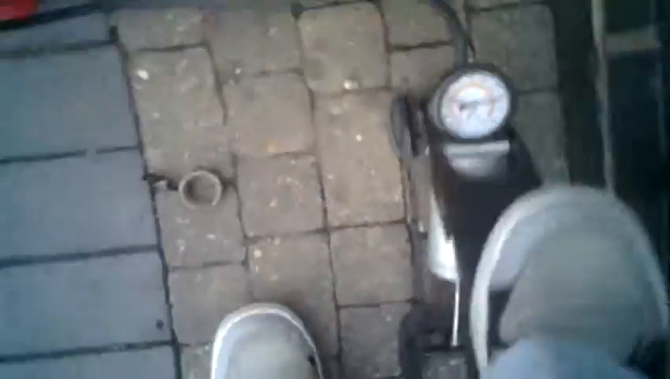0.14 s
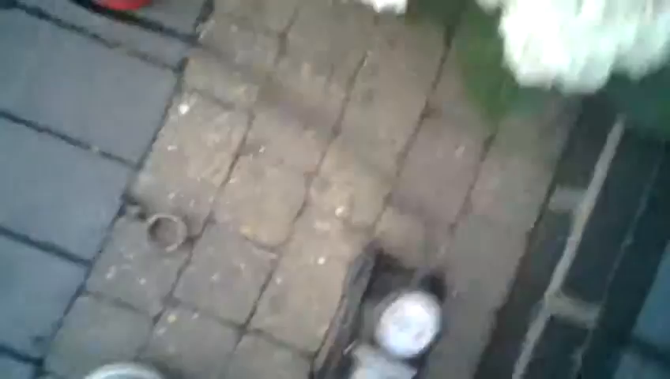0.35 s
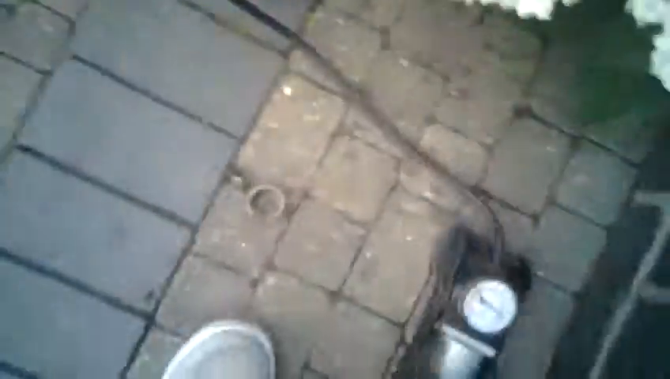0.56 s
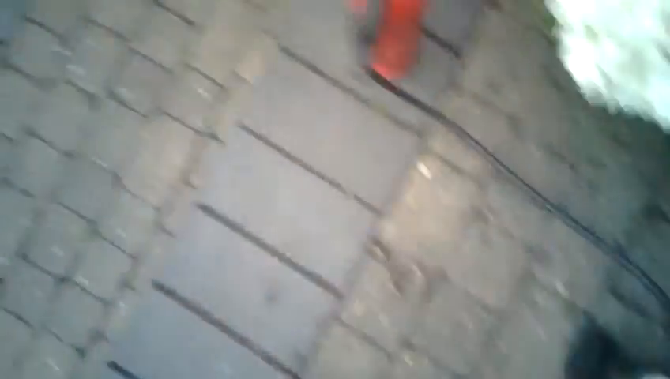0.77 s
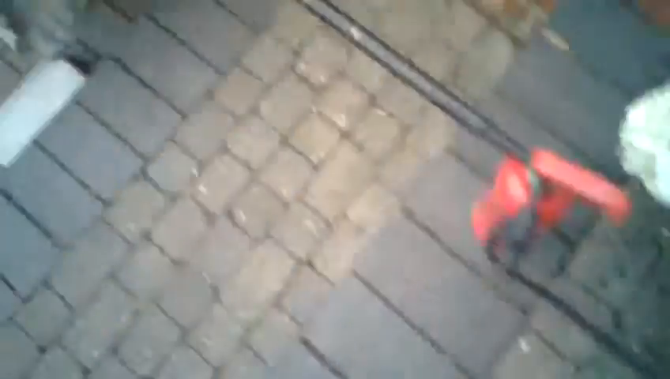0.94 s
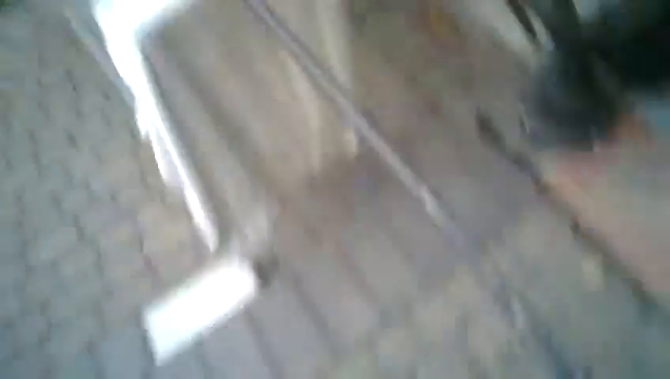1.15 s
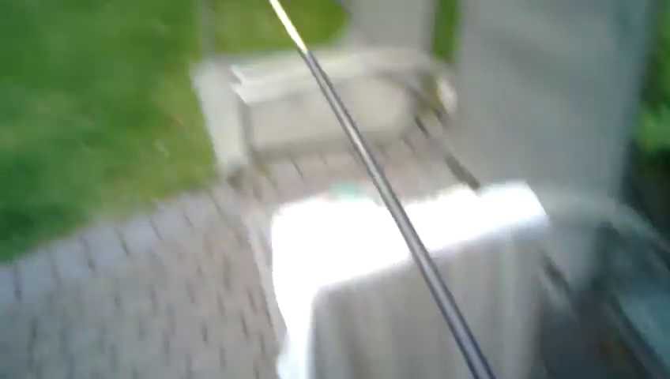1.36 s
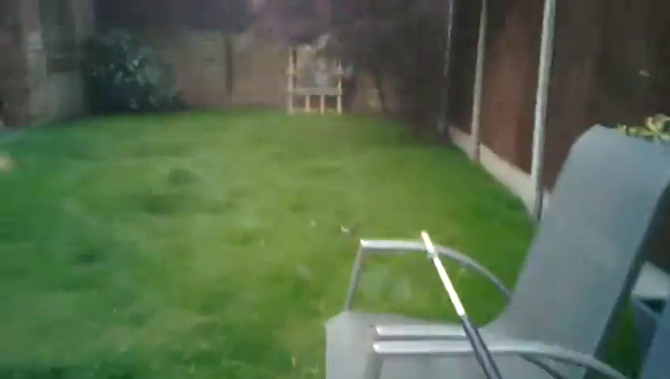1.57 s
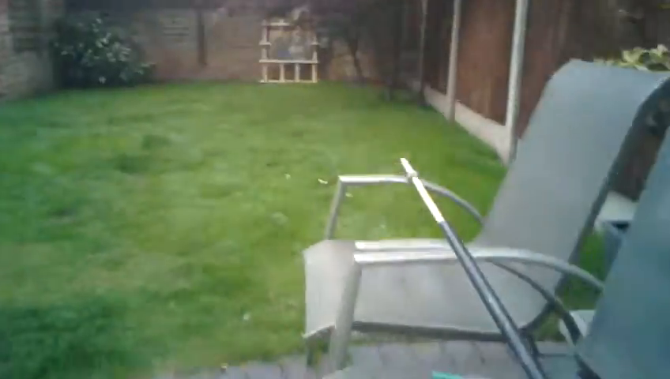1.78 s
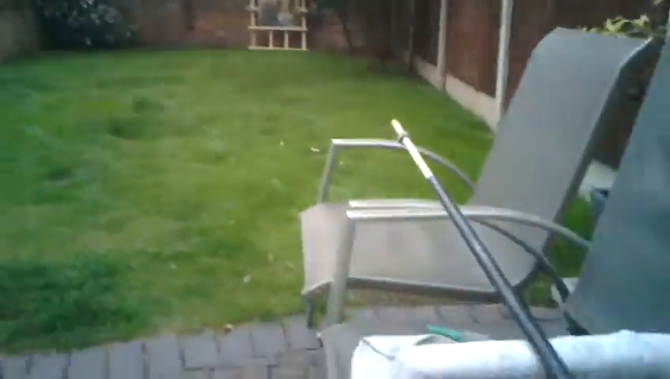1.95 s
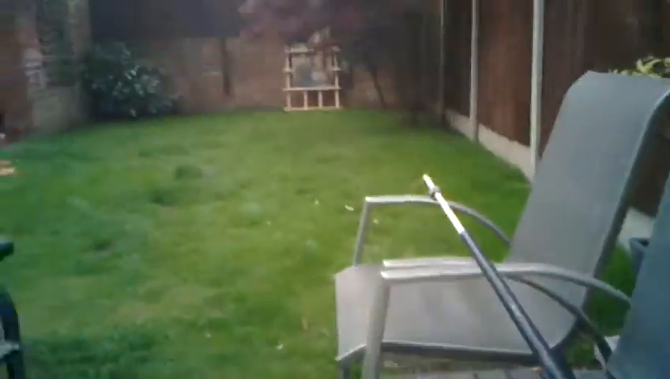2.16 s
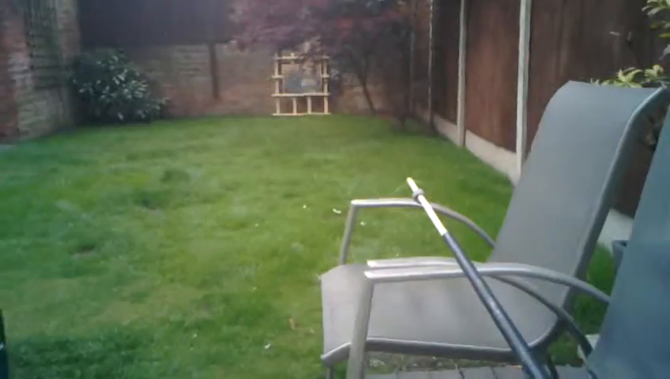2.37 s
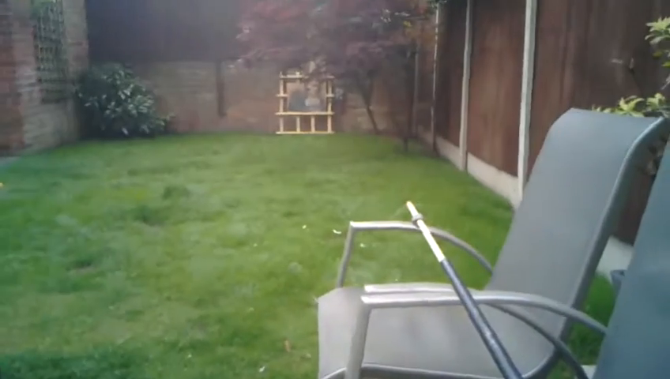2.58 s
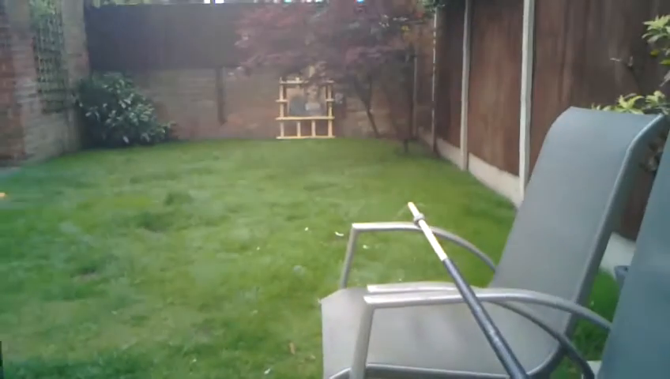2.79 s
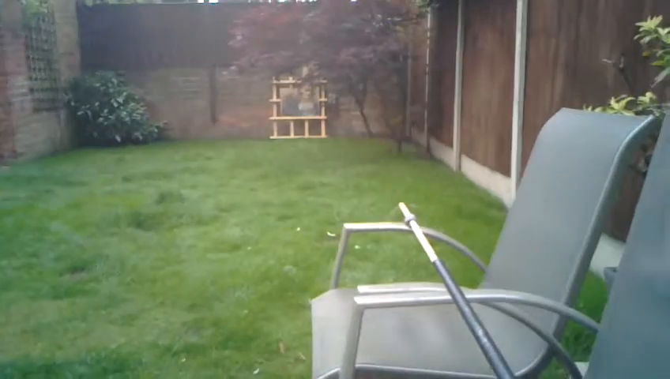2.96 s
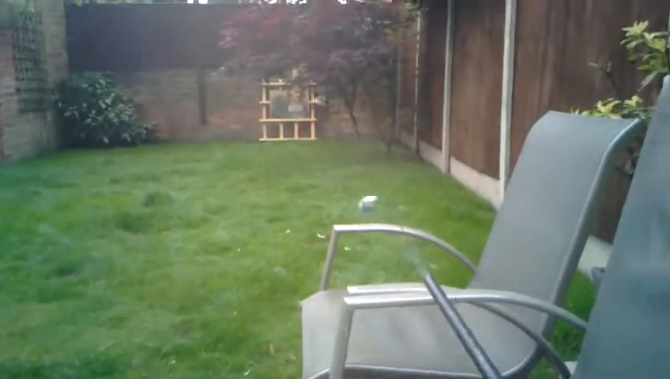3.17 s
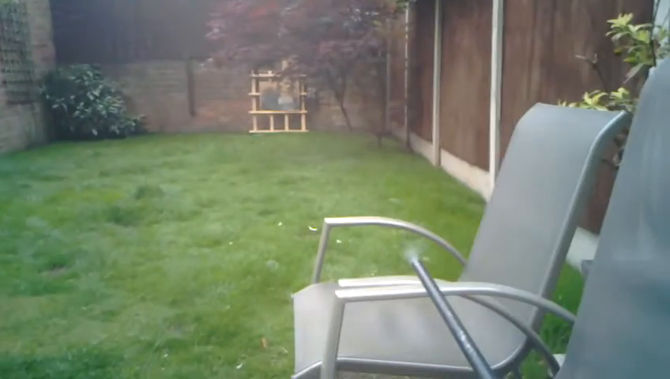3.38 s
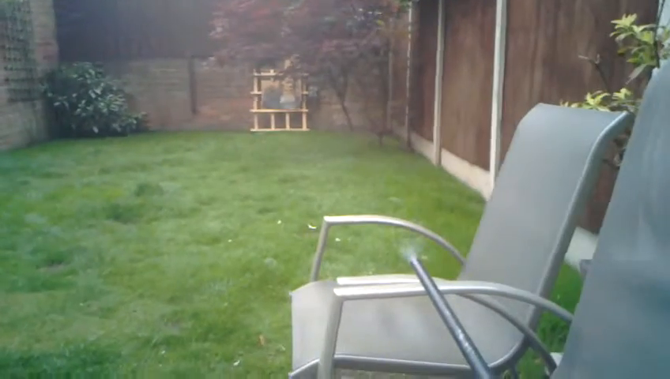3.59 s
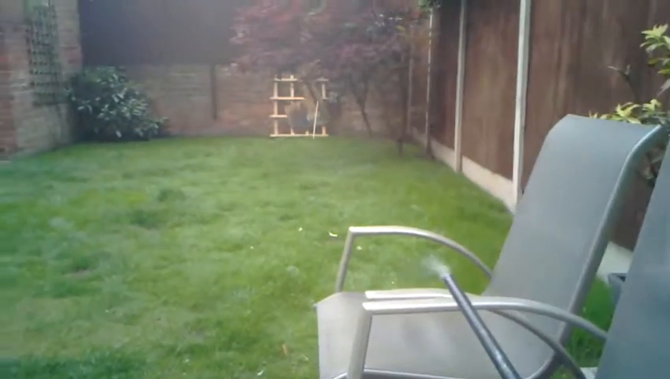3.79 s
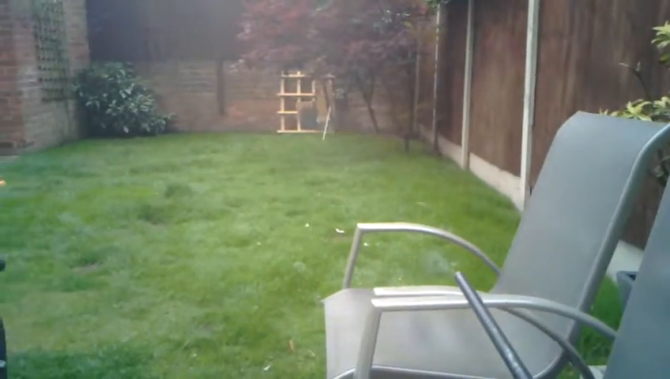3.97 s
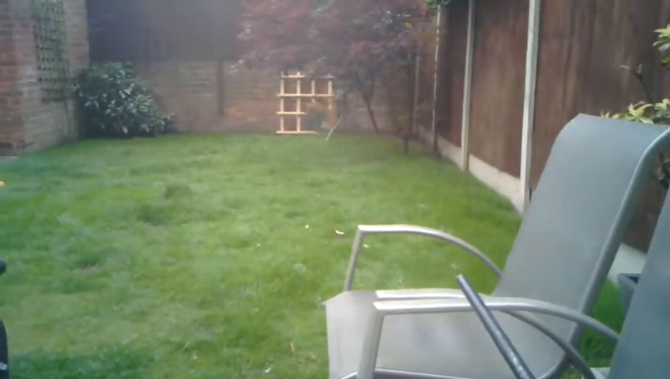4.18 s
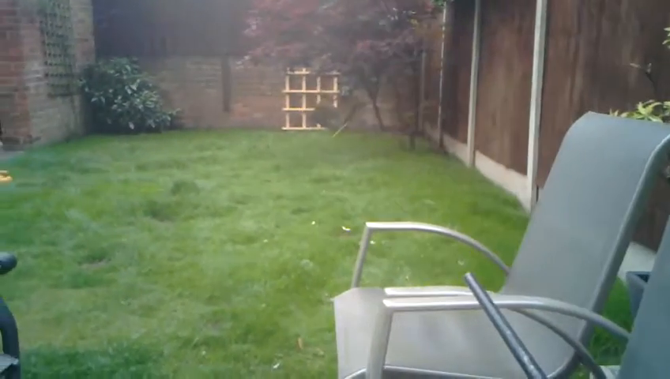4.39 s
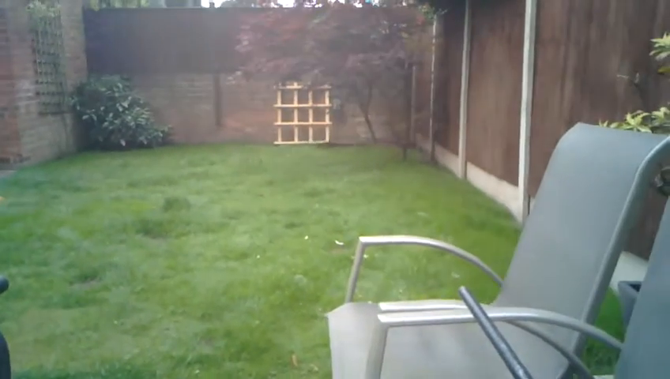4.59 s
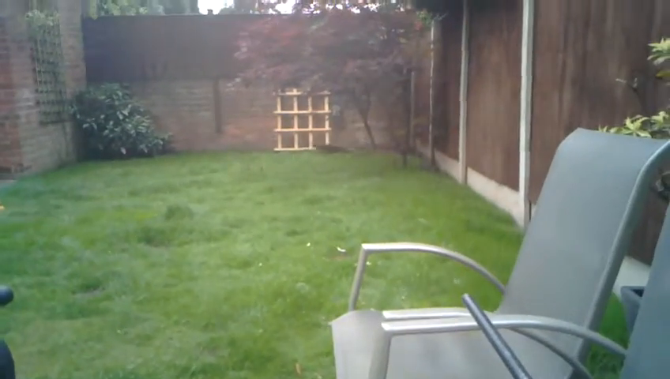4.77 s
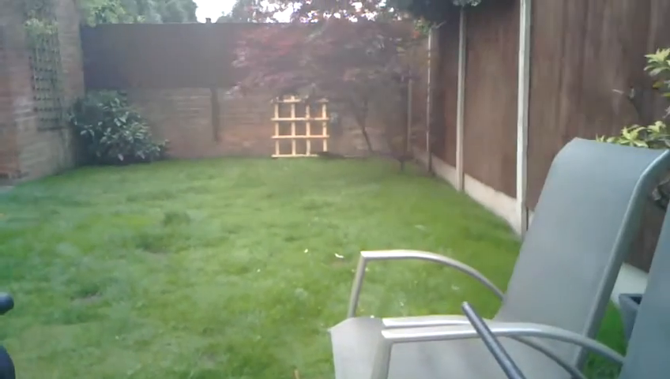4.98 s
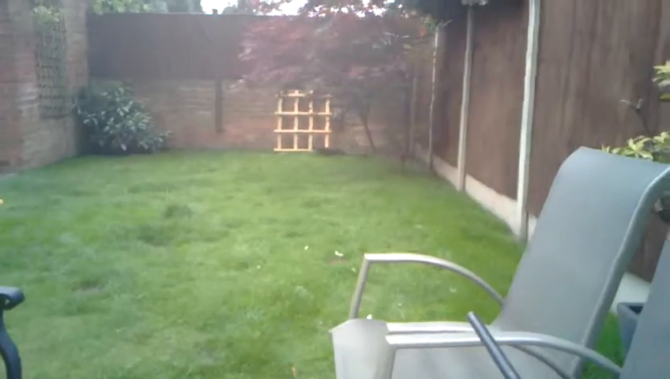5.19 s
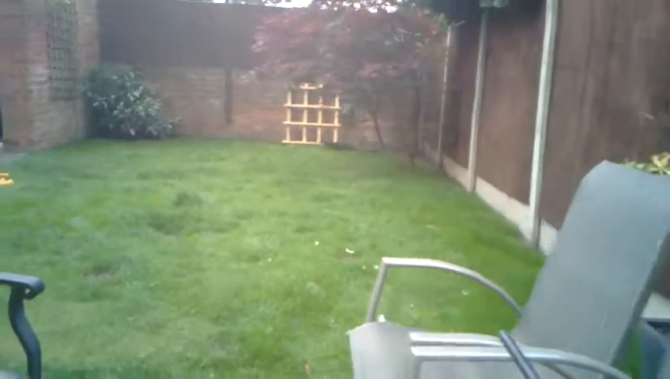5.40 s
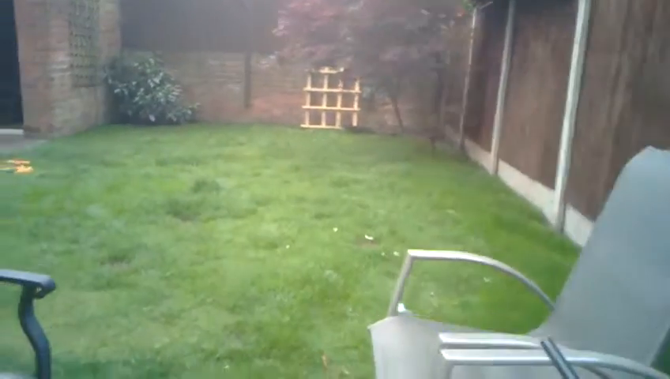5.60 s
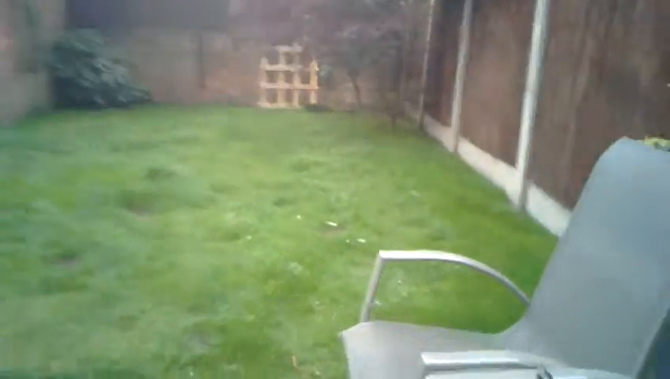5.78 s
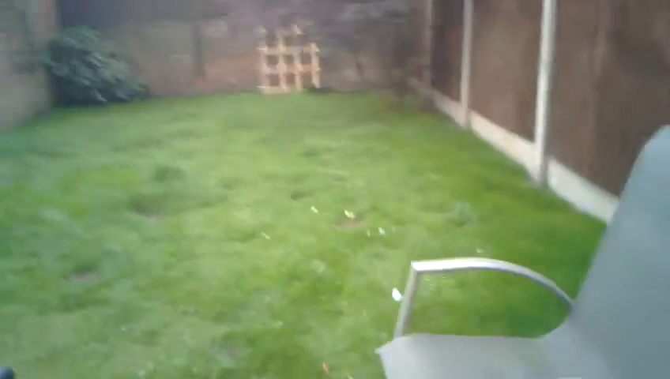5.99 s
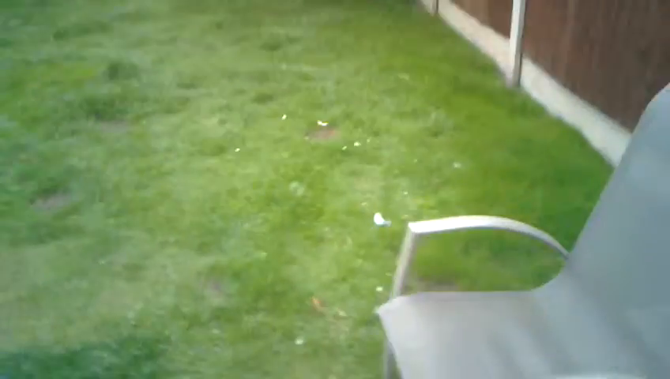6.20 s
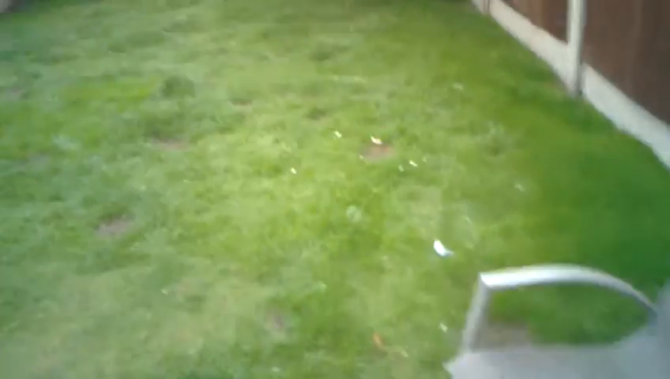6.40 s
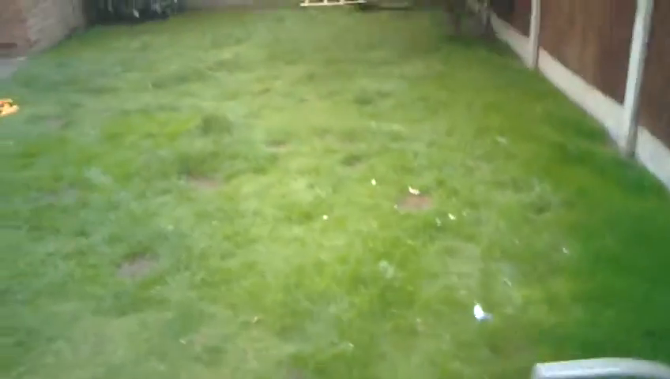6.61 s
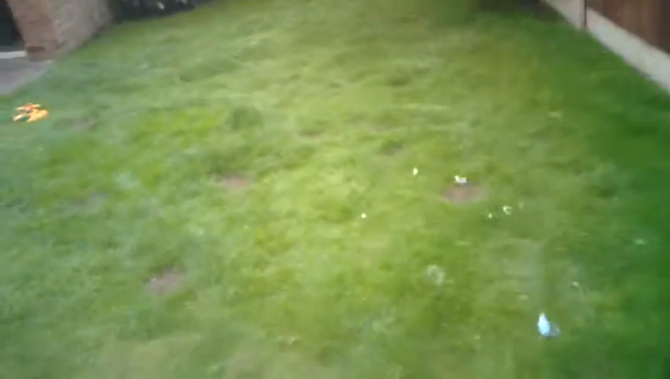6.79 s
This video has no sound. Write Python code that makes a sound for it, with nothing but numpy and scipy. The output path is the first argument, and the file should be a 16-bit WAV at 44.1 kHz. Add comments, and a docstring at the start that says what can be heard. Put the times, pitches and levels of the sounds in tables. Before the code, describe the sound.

Quick pump wheezes, footsteps and clatter, a pause, a sharp double burst of compressed air with whistle and squeak, then clicks and birdsong.

```python
"""Foot pump and air cannon in a garden

A foot pump wheezes on paving, then shoes scuff and a homemade air cannon is picked up in a fenced back garden.
Its valve hisses as shaped noise, the dart pops out as short rings, and the leak whistles as a gliding sine.
A second blast empties the tank and the valve squeaks in harmonics; then the gear knocks and clicks close by.
Small birds sing in warbling near-sines over a faint outdoor rumble of coloured noise."""
import sys
import numpy as np
from scipy import signal
from scipy.fft import rfft, irfft, next_fast_len
from scipy.io import wavfile
from scipy.ndimage import uniform_filter1d

SR = 44100
rng = np.random.default_rng(int(sys.argv[2]) if len(sys.argv) > 2 else 0)


def dump_mix(stems):
    """Bounce the given channels to the path in sys.argv[1] as a 16-bit WAV at rate SR."""
    frames = np.atleast_2d(stems).T  # one column per channel
    limited = np.clip(frames, -1, 1)  # hard clip at full scale
    pcm = np.round(limited * 32767).astype(np.int16)
    wavfile.write(sys.argv[1], SR, pcm)


N = 302085
TIME = np.arange(N) / SR


def from_db(db):
    """Decibels to gain."""
    return 10 ** (np.asarray(db) / 20)


def rms_one(x):
    """Scale to unit rms."""
    return x / np.sqrt(np.mean(x ** 2) + 1e-20)


def level(rows, axis=1):
    """Gain from one dB column of a curve, silent outside it."""
    rows = np.array(rows)
    curve_db = np.interp(TIME, rows[:, 0], rows[:, axis], left=-200, right=-200)
    return uniform_filter1d(from_db(curve_db), size=64)


def envelope(s, rise, length, release_db_per_s):
    """Swell, hold until the length is over, then die away."""
    t = TIME - s
    swell = np.clip(t / max(rise, 1e-4), 0, 1)
    fall_db = np.minimum(abs(release_db_per_s) * np.maximum(t - length, 0), 200)
    return swell * from_db(-fall_db)


def drift(rate, size=N):
    """Random wander around zero: normal draws, this many per second, joined by straight lines."""
    position = np.arange(size) / SR * rate
    count = int(position[-1]) + 2
    return np.interp(position, np.arange(count), rng.standard_normal(count))


def colour(x, spectrum):
    """Causal (minimum-phase) filter through (Hz, dB) points, falling 18 dB per octave beyond the ends."""
    size = 2 * next_fast_len(len(x))
    hz, db = np.transpose(spectrum)
    octave = np.log2(np.arange(size // 2 + 1) * SR / size + 1)
    knots = np.log2(hz)
    beyond = np.abs(octave - np.clip(octave, knots[0], knots[-1]))
    gain_db = np.interp(octave, knots, db) - 18 * beyond
    # folding the cepstrum onto positive time makes the phase minimal
    cepstrum = irfft(np.log(from_db(gain_db)))[:size // 2]
    cepstrum[1:] *= 2
    return irfft(rfft(x, size) * np.exp(rfft(cepstrum, size)))[:len(x)]


def resonate(x, peaks):
    """Lift each resonance (Hz, width Hz, dB) out of the sound with a two-pole filter, one after another."""
    for hz, width, db in peaks:
        r = np.exp(-np.pi * width / SR)
        zeros = np.array([1, 0, -1]) * (1 - r * r) / 2
        poles = [1, -2 * r * np.cos(2 * np.pi * hz / SR), r * r]
        x = x + (from_db(db) - 1) * signal.lfilter(zeros, poles, x)
    return x


def noise(spectrum, flutter_db, rate):
    """Turbulent noise of a given colour with a fluttering level, rms one."""
    return rms_one(colour(rng.standard_normal(N), spectrum) * from_db(flutter_db * drift(rate)))


def grains(per_s, spread_db):
    """Random tiny slips, a few of them much larger than the rest."""
    slips = rng.random(N) < per_s / SR
    size_db = spread_db * np.minimum(rng.exponential(1, N), 4)
    return slips * rng.choice([-1, 1], N) * from_db(size_db)


def phase_of(hz, jitter):
    """Running phase of a slightly unsteady pitch."""
    return 2 * np.pi * np.cumsum(hz * (1 + jitter * drift(700))) / SR


def note(length, start_hz, end_hz, db, warble_hz):
    """A gliding near-sine with a fast uneven warble."""
    size = int(length * SR)
    warble = np.sin(2 * np.pi * np.cumsum(130 + 60 * drift(200, size)) / SR)
    hz = np.linspace(start_hz, end_hz, size) + warble_hz * warble
    tone = np.sin(2 * np.pi * np.cumsum(hz) / SR)
    return from_db(db) * np.sqrt(2) * signal.windows.tukey(size, .6) * tone


def add(out, s, sound):
    """Mix a sound in at a time."""
    start = max(round(s * SR), 0)
    out[start:start + len(sound)] += sound[:max(N - start, 0)]


def rings(rows):
    """Each row (s, dB, Hz, t60 s) is one mode, kicked and left to die."""
    out = np.zeros(N)
    for s, db, hz, t60 in rows:
        t = TIME[:int(2 * t60 * SR)]
        add(out, s, -from_db(db - 60 * t / t60) * np.sin(2 * np.pi * hz * t))
    return out


def echoes(x, t60, delay, dull_hz):
    """Scattered reflections from fences, walls and shrubs: a sparse decaying random tail of unit energy."""
    t = TIME[:SR]
    sparse = rng.standard_normal(SR) * (rng.random(SR) < .06)
    tail = sparse * from_db(-60 * t / t60) * (t > delay)
    tail = signal.sosfilt(signal.butter(2, min(dull_hz, .45 * SR), fs=SR, output="sos"), tail)
    return signal.fftconvolve(x, tail / np.sqrt(np.sum(tail ** 2)))[:N]


# Colour of the far rumble. Each row: frequency in Hz, relative level in dB.
GARDEN_COLOUR = [(20, -15), (70, -7.5), (170, -16.5), (500, -18), (1000, -14.5), (2000, -22.5),
                 (3250, -30.5), (5100, -33), (7100, -42), (9000, -42), (16000, -37.5)]
# Distant engine. Each row: time in seconds, level in dB before the hum trim.
ENGINE_HUM = [(0, -62), (1.0, -54.5), (2.6, -64), (4.2, -72), (6.85, -78)]
# Air on the microphone. Each row: time in seconds, level in dB.
WIND_PUFF = [(6.57, -73), (6.605, -51), (6.75, -47), (6.85, -42.5)]
# Colour of that air. Each row: frequency in Hz, relative level in dB.
WIND_COLOUR = [(30, -8), (110, -0.5), (200, -6), (400, -28)]
GARDEN_DB, HUM_TRIM_DB = -59, -3


def outdoors():
    """Far traffic as coloured noise, a low engine note near 71 Hz, and a puff of wind on the microphone."""
    traffic = from_db(GARDEN_DB) * noise(GARDEN_COLOUR, flutter_db=.5, rate=12)
    engine = np.sqrt(2) * np.sin(2 * np.pi * np.cumsum(71 + 3 * drift(10)) / SR)
    hum = from_db(HUM_TRIM_DB) * level(ENGINE_HUM) * engine
    wind = level(WIND_PUFF) * noise(WIND_COLOUR, flutter_db=2.5, rate=40)
    return traffic + hum + wind


# Whistles of distant birds. Each row: start in seconds, length in seconds, start Hz, end Hz, level in dB.
FAR_WHISTLES = [(2.329, .12, 2200, 2230, -68), (2.67, 0.067, 4200, 4700, -66.5),
                (2.86, 0.047, 3910, 4780, -60), (3.953, 0.017, 2450, 2640, -52),
                (4.8, 0.33, 7800, 7800, -82.5), (4.9, .22, 2260, 2880, -71), (5.12, 0.33, 7920, 7730, -78),
                (5.1, .11, 2850, 2550, -76), (5.42, .06, 3580, 3500, -75), (5.588, .13, 7030, 6820, -62),
                (5.679, .37, 7880, 8100, -74.5)]
# Syllables of a nearer bird, each a downward slur. Each row: start in seconds, start Hz, level in dB.
NEAR_SONG = [(6.085, 3390, -60), (6.148, 3710, -52.5), (6.214, 3880, -48), (6.281, 4020, -48.5),
             (6.358, 3850, -51.5), (6.44, 3220, -61), (6.585, 4400, -50), (6.639, 4550, -52),
             (6.73, 4380, -54.5), (6.775, 3260, -57)]
SYLLABLE_S, SLUR_SHARE = 0.0505, 0.121   # length of a syllable; share of its pitch that it falls
# a second, higher voice grows with effort and equals the first at this level
UPPER_VOICE_RATIO, UPPER_VOICE_FULL_DB = 1.19, -44


def birds(scatter_db=-4, warble_hz=150):
    """Song from the shrubs, blurred by the fences; short notes warble, long ones are steadier."""
    out = np.zeros(N)
    for s, length, start_hz, end_hz, db in FAR_WHISTLES:
        add(out, s, note(length, start_hz, end_hz, db, warble_hz * min(1, 0.054 / length)))
    for s, hz, db in NEAR_SONG:
        upper_voice = (hz * UPPER_VOICE_RATIO, 2 * db - UPPER_VOICE_FULL_DB)
        for voice_hz, voice_db in (hz, db), upper_voice:
            add(out, s, note(SYLLABLE_S, voice_hz, voice_hz * (1 - SLUR_SHARE), voice_db, warble_hz))
    return out + from_db(scatter_db) * echoes(out, t60=0.2, delay=.004, dull_hz=9000)


def ticks(per_s=160):
    """Bits of grit crack at random, each ringing for a moment at its own pitch."""
    draws = rng.random((int(max(per_s, 1) * N / SR), 3))
    return rms_one(rings([(when * N / SR, -20 * size, 1500 * 4.3 ** pitch, .007) for when, size, pitch in draws]))


# Soles and sleeves rubbing. Each row: start in seconds, length in seconds, body level in dB, grit level in dB.
SCUFFS = [(0, 0.082, -44.5, -47), (0.086, 0.32, -47.5, -50), (0.458, .29, -47.5, -47.5),
          (0.617, 0.032, -40.5, -54), (.76, 0.079, -47, -46), (0.849, 0.13, -45, -53),
          (0.974, 0.2, -52, -58), (1.3, 0.073, -53, -55), (1.487, 0.086, -58, -57),
          (3.7, 0.022, -47.5, -62), (4.502, 0.084, -75, -58.5), (4.605, 0.068, -59.5, -50),
          (5.74, 0.035, -66, -55), (5.855, .04, -57, -61), (6.184, 0.63, -58, -69),
          (6.406, 0.14, -63, -57.5), (6.524, 0.039, -55, -47.5), (6.662, 0.036, -56, -51.5)]
SCUFF_RISE_S, SCUFF_RELEASE_DB_PER_S = 0.0095, 396
# Colour of the dull drag. Each row: frequency in Hz, relative level in dB.
RUB_BODY = [(130, -6.5), (550, -13), (1200, 1), (2040, -6.5), (4000, -8)]
# Colour of the bright grit. Each row: frequency in Hz, relative level in dB.
RUB_GRIT = [(2500, -1.5), (5200, 3), (7000, -6.5), (10000, -12), (16000, -14.5)]
# Resonances of the handled gear. Each row: frequency in Hz, width in Hz, lift in dB.
GEAR_MODES = [(312, 67, 1.85), (1090, 140, 4.7), (4300, 550, 4.2), (5340, 570, 3.1)]


def rubbing(tick_db=-5, hard_db=-50, uneven_db=2):
    """Soles drag over gritty paving and cloth slides over the pipe as streams of slips; hard scuffs crack more."""
    drag, force = np.zeros(N), np.zeros(N)
    for s, length, body_db, grit_db in SCUFFS:
        shape = envelope(s, SCUFF_RISE_S, length, SCUFF_RELEASE_DB_PER_S)
        drag = np.maximum(drag, from_db(body_db) * shape)
        force = np.maximum(force, from_db(grit_db) * shape)
    body = rms_one(resonate(colour(grains(5000, 3.5), RUB_BODY), GEAR_MODES))
    hardness = np.minimum(force / from_db(hard_db), 1)
    cracks = from_db(tick_db) * hardness * ticks()
    grit = rms_one(colour(grains(6000, 3.3), RUB_GRIT))
    return (drag * body + force * (grit + cracks)) * from_db(uneven_db * drift(60))


# Pump frame and cannon knocking. Each row: start in seconds, peak in dB, bass tilt in dB, treble tilt in dB.
KNOCKS = [(0.235, -24, 9, -2.5), (0.304, -22, -1, 0.5), (0.4413, -23.5, -15, -9), (0.8892, -15, -9, -4.5),
          (1.0635, -28.5, -8.5, -11), (1.0904, -17.5, -9.5, -4.5), (1.121, -25, -1.5, -1),
          (1.294, -24, 12, 0.5), (1.5007, -31, 12, 8), (1.546, -33, -8, 8), (3.703, -35, -9, -9),
          (5.6705, -26, 3, -9), (5.7306, -26, 12, -14), (5.781, -33, 23, 9.5), (6.828, -27.5, 12.5, -16)]
# A shoe lands, heel first, then the dull sole.
# Each row: start in seconds, heel peak in dB, heel treble tilt in dB, sole peak in dB.
STEPS = [(0.1411, -18, 3, -24), (0.801, -21, -2, -28.5), (1.4421, -21.5, -14, -22.5)]
# Small hard parts clicking. Each row: start in seconds, peak in dB, treble tilt in dB.
CLICKS = [(0.375, -20, 0), (1.2796, -32.5, 17), (2.214, -44, 11), (3.765, -38, -4), (4.272, -45, 0),
          (4.61, -31.5, 5), (5.827, -31, 15), (5.924, -24.5, 0), (5.958, -39, 0), (6.537, -33, 3),
          (6.4363, -18.5, 6), (6.689, -28, 4), (6.7175, -36.5, -2)]
KNOCK_T60_S = 0.07
HEEL_BASS_DB, HEEL_T60_S = -5, 0.069
SOLE_DELAY_S, SOLE_BASS_DB, SOLE_TREBLE_DB, SOLE_T60_S = .0187, 6.5, -16, 0.068
CLICK_BASS_DB, CLICK_T60_S = -11, 0.016


def contacts():
    """Every knock, heel, sole and click as (s, peak dB, bass dB, treble dB, t60 s)."""
    rows = [(*knock, KNOCK_T60_S) for knock in KNOCKS]
    for s, heel_db, treble, sole_db in STEPS:
        rows.append((s, heel_db, HEEL_BASS_DB, treble, HEEL_T60_S))
        rows.append((s + SOLE_DELAY_S, sole_db, SOLE_BASS_DB, SOLE_TREBLE_DB, SOLE_T60_S))
    return rows + [(s, db, CLICK_BASS_DB, treble, CLICK_T60_S) for s, db, treble in CLICKS]


# Small hard parts pinging. Each row: start in seconds, level in dB, frequency in Hz, t60 in seconds.
PINGS = [(0.3755, -22.5, 4170, 0.018), (1.2797, -33, 6430, 0.014), (5.8285, -24.5, 5560, 0.014)]


def knocks(crack=2.8, rattle_db=-23, rattle_t60=0.12, mode_db=9, mode_width=0.041):
    """Each contact is a crack, a quick ring in modes of its own and a weak rattle, with its own tilt of tone."""
    out, t = rings(PINGS), TIME[:SR // 5]
    for s, peak_db, bass, treble, t60 in contacts():
        decay = from_db(-60 * t / t60) + from_db(rattle_db - 60 * t / rattle_t60)
        blow = rng.standard_normal(len(t)) * decay
        blow[0] += crack
        tone = [(170, bass + 5), (400, bass + 5), (1200, 0), (2900, treble - 4),
                (5600, treble - 5), (7800, treble - 14), (15500, treble - 23)]
        mode_hz = np.geomspace(700, 8000, num=7) * 2 ** rng.uniform(-.25, .25, size=7)
        own_modes = [(hz, hz * mode_width, mode_db) for hz in mode_hz]
        hit = resonate(colour(blow, tone), GEAR_MODES + own_modes)
        add(out, s, from_db(peak_db) * hit / np.abs(hit).max())
    return out


# Strokes of the pump.
# Each row: start in seconds, length in seconds, level in dB, resonance lift at full piston speed in Hz.
STROKES = [(0.019, 0.086, -40.5, 167.6), (0.183, 0.15, -43.5, 29.1), (0.366, .15, -38.5, 682)]
# resonance of the pump at rest; how far into a stroke the piston is fastest
PUMP_REST_HZ, PISTON_FASTEST_SHARE = 1163, .64
STROKE_RISE_S, STROKE_RELEASE_DB_PER_S = 0.016, 550


def pump(width_hz=620, broad_db=-9):
    """The piston forces air through a resonance that rises with its speed; the seal gives two falling squeals."""
    flow, hz = np.zeros(N), np.full(N, float(PUMP_REST_HZ))
    for s, length, db, lift_hz in STROKES:
        flow += from_db(db) * envelope(s, STROKE_RISE_S, length, STROKE_RELEASE_DB_PER_S)
        travel = np.clip((TIME - s) / (PISTON_FASTEST_SHARE * length), 0, 2)
        hz += lift_hz * np.sin(np.pi / 2 * travel) ** 2
    # low noise times a sine makes a noise band around the moving pitch
    low_noise = signal.sosfilt(signal.butter(2, width_hz / 2, fs=SR, output="sos"), rng.standard_normal(N))
    wheeze = rms_one(low_noise * np.sin(phase_of(hz, jitter=0.0517)))
    out = flow * (wheeze + from_db(broad_db) * noise(RUB_BODY, flutter_db=5.5, rate=78))
    add(out, .08, note(0.048, 3900, 3200, -39.0, 60))
    add(out, .7, note(0.03, 10900, 9600, -44, 110))
    return out


# Leak past the valve. Each row: time in seconds, pitch in Hz, level in dB.
LEAK_WHISTLE = [(3.09, 1710, -46), (3.11, 1775, -35), (3.15, 1760, -37.5), (3.185, 1775, -33),
                (3.265, 1813, -49)]
# Resonances of the valve. Each row: frequency in Hz, width in Hz, lift in dB.
VALVE_MODES = [(2890, 290, 11), (4580, 120, 17)]
PIP_HZ = 5520   # brief high note as the whistle catches
# the seal squeaks once, its pitch climbing to a steady note
SQUEAK_AT_S, SQUEAK_RISE_S, SQUEAK_LENGTH_S, SQUEAK_RELEASE_DB_PER_S = 3.812, 0.021, 0.087, 1300
SQUEAK_FROM_HZ, SQUEAK_TO_HZ, SQUEAK_GLIDE_S = 1370, 1542, .028


def valve(squeak_db=-44, overtone_fall_db=4.5):
    """The narrow gap whistles; later the seal sticks and slips in a rising squeak of ten harmonics."""
    s, hz, _ = np.transpose(LEAK_WHISTLE)
    whistle_phase = phase_of(np.interp(TIME, s, hz), jitter=0.00245)
    whistle = level(LEAK_WHISTLE, axis=2) * np.sin(whistle_phase)
    add(whistle, 3.093, note(0.02, PIP_HZ, PIP_HZ, -32, 70))
    slack = np.exp(-np.maximum(TIME - SQUEAK_AT_S, 0) / SQUEAK_GLIDE_S)
    squeak_hz = SQUEAK_TO_HZ + (SQUEAK_FROM_HZ - SQUEAK_TO_HZ) * slack
    phase = phase_of(squeak_hz, jitter=0.0053 + 0.0145 * slack)
    slips = sum(from_db(squeak_db - overtone_fall_db * k) * np.sin((k + 1) * phase) for k in range(10))
    shape = envelope(SQUEAK_AT_S, SQUEAK_RISE_S, SQUEAK_LENGTH_S, SQUEAK_RELEASE_DB_PER_S)
    return np.sqrt(2) * (whistle + resonate(slips * shape, VALVE_MODES))


BLAST_AT_S = 3.2663   # the second blast, shared by its gush and its pop
# The valve lets air go in gushes. Each row: start in seconds, rise in seconds, length in seconds,
# level in dB before the band balance, sag in dB per second, release in dB per second, brightness in dB per band.
GUSHES = [(2.912, .012, .05, -55, 0, 300, 13), (2.91, 0.048, 0.096, -45, -73, 300, 6.5),
          (3.007, 0.036, 0.083, -27.5, 6, 350, 3.5), (3.095, 0.0054, 0.011, -40.5, 0, 600, -8.5),
          (3.101, .02, 0.1, -35.5, 37, 220, 4.5), (BLAST_AT_S, .002, 0.26, -27, 90, 123, -3),
          (3.637, 0.019, 0.18, -57.5, 7, 115, -9.5)]
# Bands of the jet, from low roar to top hiss. Each row: low edge in Hz, high edge in Hz.
JET_BANDS = [(100, 700), (700, 2500), (2500, 6500), (6500, 17000)]
# Balance of these bands. Each row: level in dB, share of the sag.
JET_BALANCE = [(-5, 1.02), (-0.5, 0.66), (-1, 1.12), (-12, 1.35)]
# Colour of the escaping air. Each row: frequency in Hz, relative level in dB.
JET_COLOUR = [(100, -14), (280, -5), (785, -5.5), (1300, -2), (2000, -6.5), (5400, -7), (7700, -19.5),
              (16000, -31.5)]
# Resonances of the barrel. Each row: frequency in Hz, width in Hz, lift in dB.
BARREL_MODES = [(295, 50, 4.5), (605, 32, 1), (1350, 130, 1.5), (2650, 56, 1), (3500, 70, 4),
                (4860, 110, 6)]


def jet(eddy_db=1.3, gust_db=1.0, gust_rate=45):
    """Escaping air roars through the barrel in gusts; as the pressure falls the top hiss sags fastest."""
    air = resonate(noise(JET_COLOUR, flutter_db=eddy_db, rate=350), BARREL_MODES)
    shapes = [envelope(s, rise, length, release) for s, rise, length, _, _, release, _ in GUSHES]
    out = np.zeros(N)
    for k, (band, (band_db, sag_share)) in enumerate(zip(JET_BANDS, JET_BALANCE)):
        # each band takes a different second of the noise
        band_filter = signal.butter(3, band, "band", fs=SR, output="sos")
        part = rms_one(signal.sosfilt(band_filter, np.roll(air, k * SR)))
        height = k - (len(JET_BANDS) - 1) / 2
        power = np.zeros(N)
        for shape, (s, _, length, db, sag, _, bright) in zip(shapes, GUSHES):
            sag_db = sag_share * sag * np.clip(TIME - s, 0, length)
            power += (shape * from_db(db + bright * height - sag_db)) ** 2
        gusts_db = gust_db * drift(gust_rate) / (k + 1)
        out += part * from_db(band_db + gusts_db) * np.sqrt(power)
    return out


# Pops at the muzzle. Each row: start in seconds, level in dB, ring in Hz, low thump level in dB.
POPS = [(3.0007, -8, 1320, -14), (BLAST_AT_S, -9.5, 1430, -38)]
POP_T60_S, BARREL_ROUND_TRIP_S, BOUNCE_LOSS_DB, BOUNCE_PITCH_SHARE = 0.0077, 0.00201, 4, 0.8
THUMP_HZ, THUMP_T60_S = 329, 0.016
TANK_HZ, TANK_T60_S, TANK_DB = 70, .15, -25   # the tank booms this far under the thump
# Last puffs from the emptying tank. Each row: start in seconds, level in dB, ring in Hz.
TANK_PUFFS = [(3.657, -42, 231), (3.712, -39.5, 222), (3.766, -40.5, 118), (3.787, -41, 222),
              (3.85, -45, 126)]
PUFF_RING_T60_S = 0.24


def blasts(puff_db=-18, puff_t60=0.095):
    """Steep pressure fronts bounce along the barrel, duller each time; a puff of turbulence follows the dart out."""
    modes = [(s, db, hz, PUFF_RING_T60_S) for s, db, hz in TANK_PUFFS]
    for s, db, hz, thump_db in POPS:
        for k in range(3):
            bounce_hz = hz * BOUNCE_PITCH_SHARE ** k
            modes.append((s + k * BARREL_ROUND_TRIP_S, db - k * BOUNCE_LOSS_DB, bounce_hz, POP_T60_S))
        back = s + BARREL_ROUND_TRIP_S
        modes.append((back, thump_db, THUMP_HZ, THUMP_T60_S))
        modes.append((back, thump_db + TANK_DB, TANK_HZ, TANK_T60_S))
    out, t = rings(modes), TIME[:SR // 3]
    turbulence = rms_one(resonate(colour(rng.standard_normal(len(t)), JET_COLOUR), BARREL_MODES))
    add(out, 3.003, turbulence * from_db(puff_db - 60 * t / puff_t60))
    return out


def scene():
    """Close sounds with the garden's short echo, birds and air behind them."""
    near = rubbing() + knocks() + pump() + valve() + jet() + blasts()
    garden_echo = from_db(-20.5) * echoes(near, t60=0.41, delay=0.011, dull_hz=5170)
    return (outdoors() + birds() + garden_echo + near)[None]


CUTOFF_HZ = 16200


def record(dry):
    """The top is cut steeply by an elliptic low-pass."""
    return signal.sosfilt(signal.ellip(10, .2, 80, CUTOFF_HZ, fs=SR, output="sos"), dry)


dry = scene()
out = record(dry)
dump_mix(out)
```